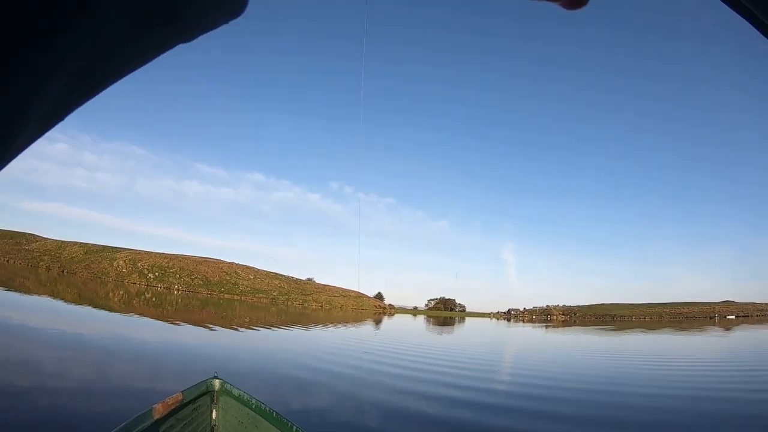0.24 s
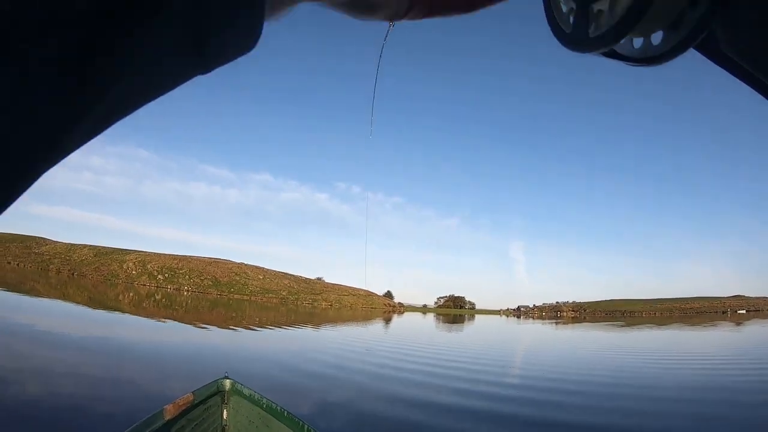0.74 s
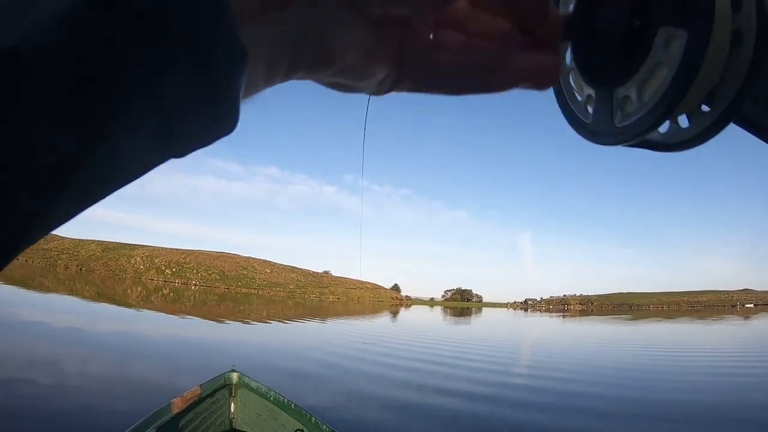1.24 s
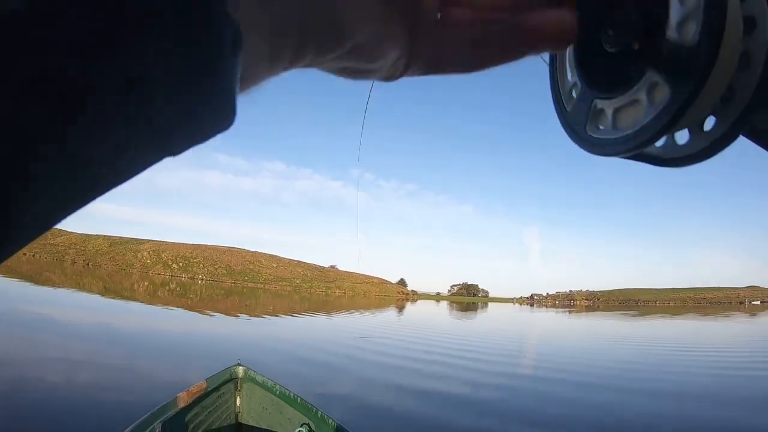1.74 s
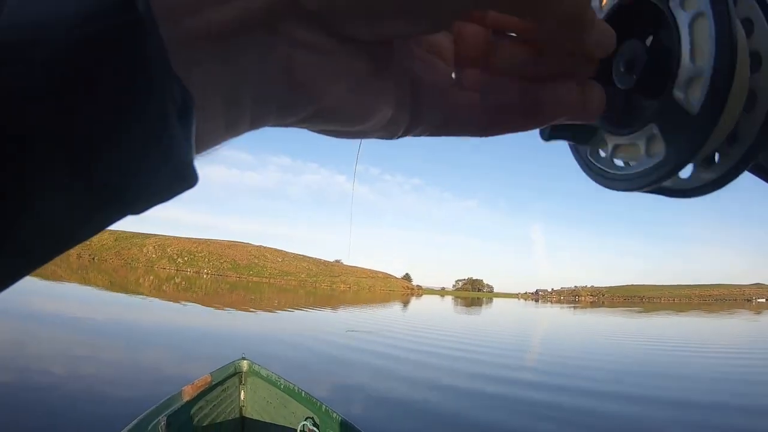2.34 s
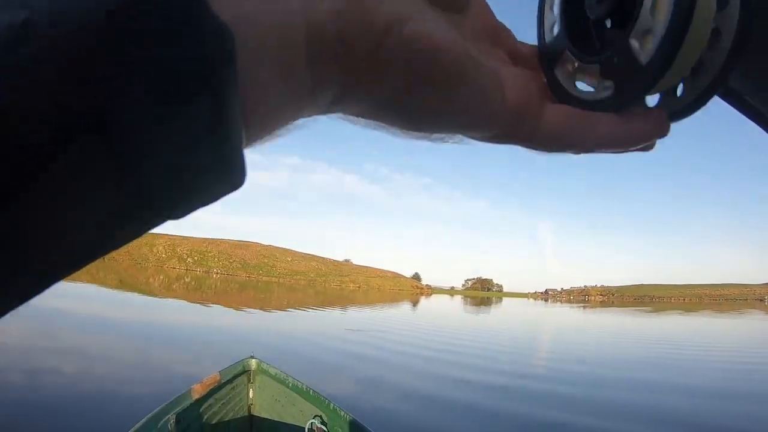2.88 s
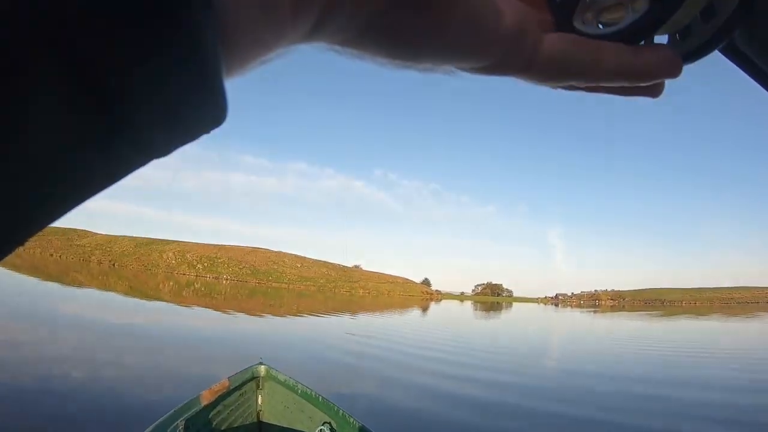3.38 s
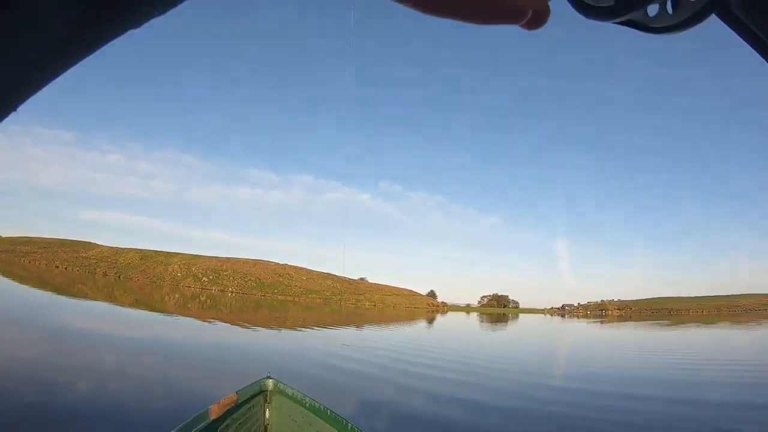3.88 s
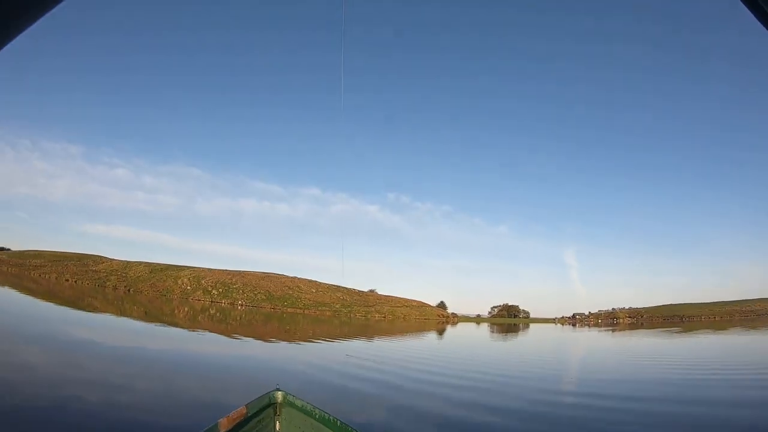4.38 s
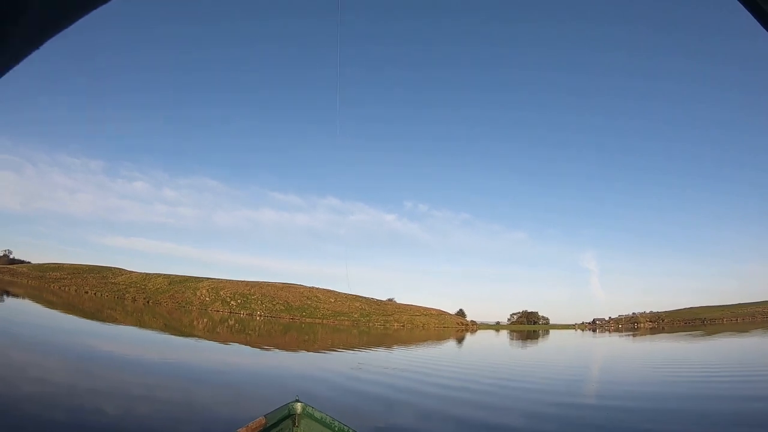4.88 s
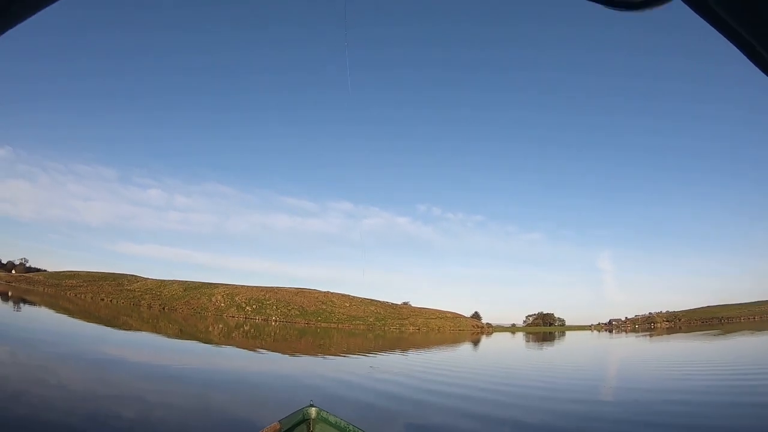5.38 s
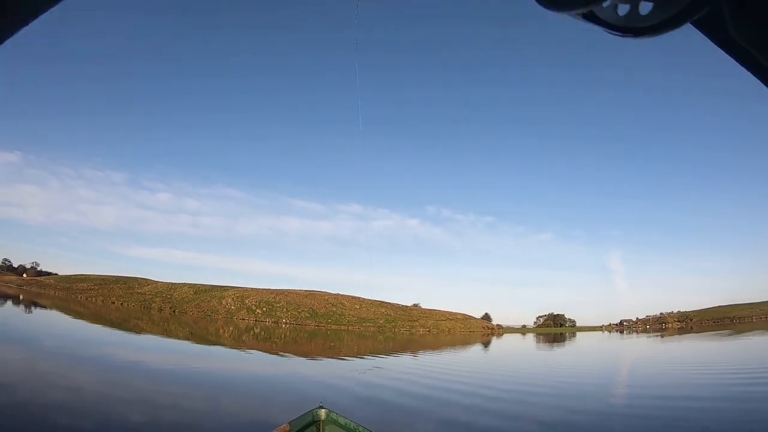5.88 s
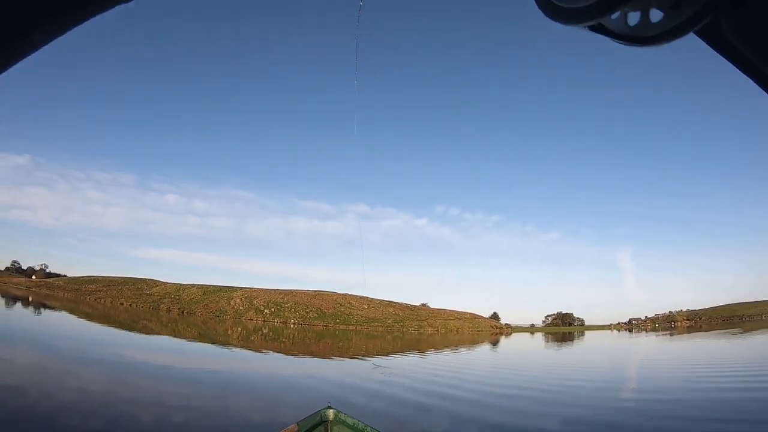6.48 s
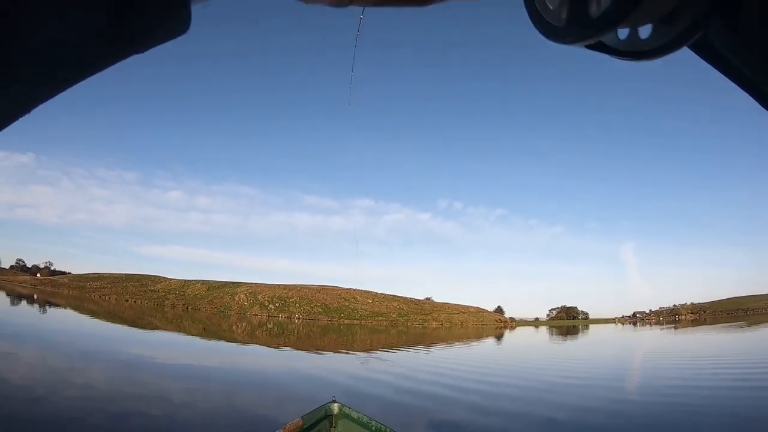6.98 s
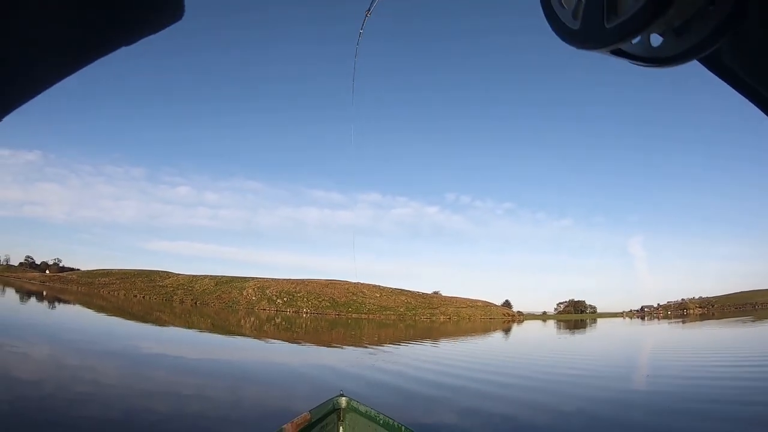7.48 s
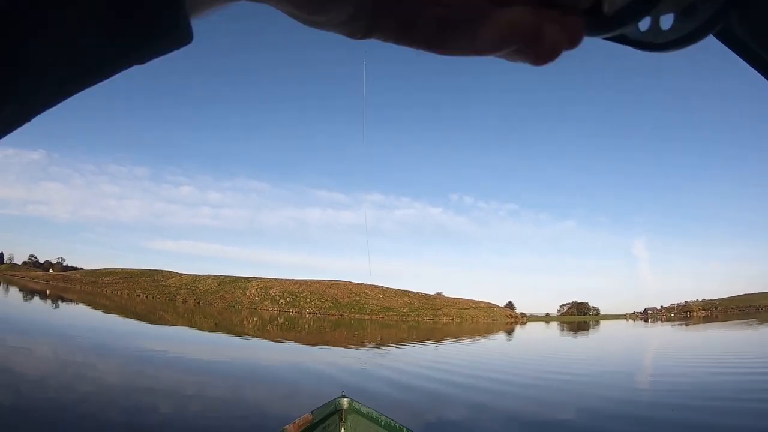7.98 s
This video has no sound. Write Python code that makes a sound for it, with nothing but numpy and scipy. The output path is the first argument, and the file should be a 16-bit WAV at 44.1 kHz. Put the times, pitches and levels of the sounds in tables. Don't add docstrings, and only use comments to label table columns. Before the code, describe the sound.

Close metallic ratchet clicking from a hand-cranked fishing reel, a short raspy zip of line, a quiet gap, then a longer steady winding and halting clicks.

```python
import sys
import numpy as np
from scipy import signal
from scipy.io import wavfile

SR = 44100
rng = np.random.default_rng(int(sys.argv[2]) if len(sys.argv) > 2 else 0)


def convert_level_to_amplitude(level_db):
    exponent = np.asarray(level_db, float) / 20
    return 10 ** exponent


def inscribe(sig):
    pcm = np.round(np.clip(np.atleast_2d(sig).T, -1, 1) * 32767)
    wavfile.write(sys.argv[1], SR, pcm.astype(np.int16))


N = 362943

# frequency in Hz, t60 in s, level winding in dB, level stripping in dB.
PAWL_MODES = [(2070, 0.006, -8, -14), (3095, 0.0048, -10, -10), (4257, 0.0042, 0, -11.5),
              (5510, 0.004, -5, 0.5), (6440, 0.0032, -3, 5.5), (7230, 0.086, -30.5, -31.5),
              (7730, 0.0035, -8.5, -10.5), (8660, 0.016, -13.5, -7), (9648, 0.0071, -1.5, -2),
              (10250, 0.0053, -11.5, -12), (12400, 0.0035, -17, -24.5), (13900, .004, -17.5, -19.5)]


def at_hz(points, hz):
    point_hz, value = np.transpose(points)
    return np.interp(np.log(hz), np.log(point_hz), value)


def drift(rate):
    knots = rng.standard_normal(int(N / SR * rate) + 2)
    return np.interp(np.arange(N) / SR * rate, np.arange(len(knots)), knots)


def filtered(x, order, hz, kind="low"):
    return signal.sosfilt(signal.butter(order, hz, kind, fs=SR, output="sos"), x)


def banded_noise(spectrum, patchy_db, alike_hz):
    out = 0
    edges = 30 * 2 ** np.arange(0, 9.6, 0.5)
    white = rng.standard_normal((2, 2, N))
    for k, (low, high) in enumerate(zip(edges, edges[1:])):
        mid, side = filtered(white[k % 2], 2, [low, high], "band")
        alike = 0.73 / (1 + (low / alike_hz) ** 2)
        gain = convert_level_to_amplitude(at_hz(spectrum, np.sqrt(low * high)) + patchy_db * drift(14))
        out = out + gain * (np.sqrt(1 + alike) * mid + np.sqrt(1 - alike) * side * [[1], [-1]])
    return out / np.sqrt(np.mean(out ** 2))


def open_air():
    # frequency in Hz, level in dB per Hz.
    air_spectrum = [(30, -28), (105, -33.5), (150, 5.5), (280, 2.5), (600, -3), (2400, -17.5), (9500, -42),
                    (15000, -51)]
    air = convert_level_to_amplitude(-60.5) * banded_noise(air_spectrum, patchy_db=6.0, alike_hz=503)
    return air - 0.55 * filtered(air, 1, [55, 115], "band")


def sleeve_rustle():
    # time in seconds, level in dB.
    rub_levels = [(0, -53.5), (0.601, -46), (2.45, -49), (2.65, -49.5), (3.1, -52.5), (3.249, -67.5),
                  (3.7, -66), (3.9, -53.5), (4.12, -55), (4.19, -66), (4.3, -53), (4.6, -59), (4.9, -46),
                  (7.41, -48.5), (7.445, -62.5), (7.75, -62), (7.85, -50)]
    # frequency in Hz, level in dB per Hz.
    cloth_spectrum = [(500, -7.5), (1300, 2.5), (4000, -1), (9700, -8), (11500, -35), (15000, -27.5)]
    rub_db = np.interp(np.arange(N) / SR, *np.transpose(rub_levels))
    return convert_level_to_amplitude(rub_db) * banded_noise(cloth_spectrum, patchy_db=4.0, alike_hz=626)


def ring(clicks, hz, t60):
    r = convert_level_to_amplitude(-60 / (t60 * SR))
    w = 2 * np.pi * hz / SR
    return signal.lfilter([0, np.sin(w)], [1, -2 * r * np.cos(w), r * r], clicks + 1e-18)


def struck(modes, s, level_db, bounce_db, fade_db, spread_db, soft_hz, count):
    # frequency in Hz, likeness of a snap at the left and right ports (1 same, -1 opposite).
    port_likeness = [(3600, 0.79), (5500, 0.5), (7500, 0.12), (13000, -0.53)]
    late_ms = np.c_[0 * s, rng.uniform(-4, 11, (len(s), count))]
    fall_db = np.where(late_ms < 0, 4.5 - 3.25 * late_ms, fade_db * late_ms)
    size = convert_level_to_amplitude(level_db[:, None] + np.where(late_ms != 0, bounce_db - fall_db, 0))
    at = np.clip((s[:, None] + late_ms / 1000) * SR, 0, N - 1).astype(int)
    out = np.zeros((2, N))
    for k, (hz, t60, mode_db) in enumerate(modes):
        brightness = min(hz / 6000, 1)
        shared, own = rng.standard_normal((2, len(s), count + 1)) * brightness
        own[:, 0] *= brightness
        shared[:, 0] = (-1) ** k * min(soft_hz / hz, 1) ** 2
        snap_db = spread_db * np.clip(rng.standard_normal((len(s), 1)), -2, 1.3)
        wander_db = 2.65 * drift(18)[at[:, :1]]
        share = size * convert_level_to_amplitude(mode_db + snap_db + wander_db)
        like = np.clip(at_hz(port_likeness, hz), -1, 1)
        left, right = shared, like * shared + np.sqrt(1 - like ** 2) * own
        for port, hit in enumerate([left, right]):
            clicks = np.bincount(at.ravel(), (share * hit).ravel(), N)
            out[port] += ring(clicks, hz, t60)
    return out


def wound_teeth(turns, teeth, slack, ring_db, effort, first):
    turn = np.repeat(np.arange(len(teeth)), teeth)
    place = np.concatenate([np.arange(n) for n in teeth])
    share = place / np.array(teeth)[turn]
    s, sin1, cos1, sin2, cos2 = np.array(turns)[turn].T
    w = 2 * np.pi * share
    lag_ms = sin1 * np.sin(w) + cos1 * (1 - np.cos(w))
    lag_ms = lag_ms + sin2 * np.sin(2 * w) + cos2 * (1 - np.cos(2 * w))
    turn_s = np.diff(np.array(turns)[:, 0])[turn]
    at = s + share * turn_s + lag_ms / 1000
    firm, loose = np.clip(rng.standard_normal((len(at), 2)), -2, 1.4).T
    is_slack = place < np.array(slack)[turn]
    loaded_db = np.array(ring_db)[np.minimum(place, len(ring_db) - 1)]
    spool_db = np.where(is_slack, -39.5, loaded_db) + 2 * firm
    pawl_db = np.where(is_slack, -22.5 - 0.48 * place, -28) + 2 * (loose - firm / 2)
    levels_db = np.c_[spool_db, pawl_db] + np.array(effort)[turn]
    return np.c_[at, levels_db][first:]


def first_winding():
    # turn start (hand over the top) in seconds, lag once a turn as sine and cosine in ms,
    # lag twice a turn as sine and cosine in ms. The last row ends the winding.
    first_turns = [
        (0.3585, -2.5, 15, -1.5, -0.19),
        (0.693, -2.5, -0.7, 3, -2.07),
        (0.9707, 5.5, -2.5, 2.5, -2.06),
        (1.2191, 2, -0.5, 3.2, -1.6),
        (1.4594, 1, -3, 1.5, 0.87),
        (1.7295, 8.5, 2, -0.5, 0.6),
        (1.9827, 4, 0.6, 3.5, -2.1),
        (2.2157, 0, 0, 0, 0),
    ]
    first_teeth = [15, 17, 15, 14, 16, 15, 14]
    first_slack = [0, 5, 4, 4, 5, 4, 4]
    first_ring = [-23, -23, -23, -23, -24.5, -23, -25, -20.5, -30, -17, -27, -21, -20.5, -21, -20.5]
    # effort on the ring in dB, on the rattle in dB.
    first_effort = [(-1.1, -1.7), (-0.5, -0.3), (0.6, 0.6), (-1.5, 0.9), (0.7, 0.4), (.6, 1.5), (1.9, 1.3)]
    return wound_teeth(first_turns, first_teeth, first_slack, first_ring, first_effort, first=6)


def second_winding():
    # turn start (hand over the top) in seconds, lag once a turn as sine and cosine in ms,
    # lag twice a turn as sine and cosine in ms. The last row ends the winding.
    second_turns = [(4.7787, -2.5, 13.5, 0.7, 0.0), (5.0531, 5, 6.5, 1.5, 1.9), (5.2738, 4, 1.5, 2.5, 0.1),
                    (5.4947, 0.6, 0.7, 2.5, 1.1), (5.711, 0.7, 2.5, 2.5, -0.7), (5.931, 2.5, 2.1, 3, -1.0),
                    (6.1394, 3.4, 4, 3, 1.5), (6.3486, 3, 6, 1, 2.0), (6.5609, 3, 2.5, 0.1, 0.44),
                    (6.7679, 4.5, 7.5, -0.5, 1.5), (6.9849, 5, 3, 0.2, -0.63), (7.1997, 3.0, 5.5, 0, 0.2),
                    (7.4079, 0, 0, 0, 0)]
    second_teeth = [15] * 9 + [16, 14, 15]
    second_slack = [0] + [3] * 5 + [2] * 6
    second_ring = [-22, -22, -22, -20, -21.5, -22.5, -23.5, -24, -25, -20.5, -22, -26, -20, -21, -20.5]
    # effort on the ring in dB, on the rattle in dB.
    second_effort = [(-1.4, -.3), (-1.1, .3), (-1.3, .3), (0.18, 0.38), (0.37, .3), (0.56, -.3),
                     (0.37, -0.41), (-.3, -.3), (0.76, -0.29), (-0.58, -0.15), (-0.11, -0.67),
                     (0.37, -0.02)]
    return wound_teeth(second_turns, second_teeth, second_slack, second_ring, second_effort, first=4)


def frame_knocks():
    # start in seconds, level in dB.
    spool_knocks = [(0.2729, -22.5), (2.3141, -23), (4.5322, -32), (4.5365, -35), (4.6864, -21),
                    (4.8645, -27.5), (4.8878, -23), (4.9118, -37), (7.8273, -32)]
    # frequency in Hz, t60 in s, level in dB.
    frame_modes = [(2130, 0.0068, -0.5), (2430, 0.022, -3)]
    return struck(frame_modes, *np.transpose(spool_knocks), bounce_db=-15, fade_db=1, spread_db=1,
                  soft_hz=20000, count=4)


def winding_reel():
    # start in seconds, spool ring in dB, pawl rattle in dB.
    loose_ticks = [(0.1725, -42, -43), (2.3141, -35, -34), (2.3224, -45, -27.5), (2.3318, -48, -25),
                   (2.3404, -40, -38), (2.35, -40.5, -32), (2.3604, -40, -32), (2.375, -45, -38),
                   (2.395, -26.5, -36), (3.5343, -47, -36.5), (3.8169, -48, -35), (3.8746, -56, -33.5),
                   (4.082, -60, -37), (4.2207, -34, -52), (4.2359, -40, -46), (4.2697, -44, -41),
                   (4.2875, -35, -38), (4.3237, -35.5, -63), (4.3306, -38, -45), (4.4189, -58, -37),
                   (4.5322, -30, -45), (4.5365, -53, -31.5), (7.7334, -36, -54)]
    # start in seconds, spool
    # ring in dB, pawl rattle in dB.
    slow_teeth = [(0.264, -51, -39.5), (0.2729, -28.5, -31), (0.33, -58, -20.5), (0.3619, -47.5, -22.5),
                  (0.3874, -35, -21), (0.4104, -28.5, -24.5), (0.4345, -33, -25.5), (0.4674, -42, -24.5),
                  (0.4998, -37.5, -27), (2.2157, -38, -17.5), (4.6864, -23, -33), (4.7207, -31, -23.5),
                  (4.7518, -32, -21), (4.7853, -37.5, -23.5), (4.8137, -29, -21), (4.8399, -35.5, -21.5),
                  (6.7977, -35, -20.5), (7.4076, -20.5, -38)]
    # start in seconds, spool ring in dB, pawl rattle in dB.
    halting_teeth = [(7.8263, -26, -32), (7.8618, -38, -25.5), (7.893, -25.5, -25.5), (7.921, -24.5, -23.5),
                     (7.9448, -18, -33), (7.9606, -39, -21.5), (7.973, -22, -35.5), (8.0131, -28, -34),
                     (8.0363, -30.5, -28), (8.056, -22.5, -28.5), (8.0735, -23.5, -29.5),
                     (8.0905, -20.5, -29.5), (8.1079, -21, -30), (8.1237, -29, -29), (8.1402, -19.5, -30.5),
                     (8.1632, -22, -36), (8.1956, -20, -30), (8.218, -30.5, -22)]
    # frequency in Hz, t60 in s, level in dB.
    spool_modes = [(1502, 0.032, -17.5), (2143, 0.0092, -12.5), (2940, 0.0045, -3.5), (3265, 0.0082, -1.5),
                   (3645, 0.013, -1.5)]
    # time in seconds, rattle level in dB, pan to the left in dB.
    reel_places = [
        (3.2, 1.4, 2.2),
        (4.6, -1.1, 1.1),
    ]
    ticks = np.array(loose_ticks) - [0, 8.5, 0]
    snaps = np.vstack([first_winding(), second_winding(), slow_teeth, halting_teeth, ticks])
    s, spool_db, pawl_db = snaps.T
    spool = struck(spool_modes, s, spool_db + 7.5, bounce_db=-12, fade_db=1.2, spread_db=1.6,
                   soft_hz=20000, count=8)
    spool = filtered(spool, 2, 5600)
    pawl = struck(np.array(PAWL_MODES)[:, :3], s, pawl_db + 1.0, bounce_db=-1.0, fade_db=1.96,
                  spread_db=2.0, soft_hz=7050, count=32)
    moved_s, *place = np.transpose(reel_places)
    near_db, pan_db = [np.interp(np.arange(N) / SR, moved_s, column) for column in place]
    pawl = pawl * convert_level_to_amplitude(near_db + pan_db * [[1], [-1]])
    body = (spool + frame_knocks()) * convert_level_to_amplitude([[-0.9], [0.9]])
    return filtered(body + pawl, 6, 1850, "high")


def knocks():
    # start in seconds, level in dB, frequency in Hz, length in s.
    housing_bumps = [(0.306, -49, 190, 0.029), (1.268, -47, 294, 0.03), (2.302, -47, 214, 0.038),
                     (2.509, -47.5, 213, 0.032), (2.933, -54, 367, 0.028), (4.059, -37, 810, 0.0022),
                     (4.102, -53, 338, 0.019), (4.489, -44.5, 139, 0.069), (5.48, -52.5, 218, 0.099),
                     (6.46, -47, 216, 0.15), (7.001, -55, 250, .035)]
    out = np.zeros(N)
    for s, level_db, hz, length in housing_bumps:
        swell = np.exp(-((np.arange(N) / SR - s) / length * 2 - 1) ** 2 * 2)
        push = np.gradient(rng.standard_normal(N)) * swell
        dull = ring(ring(push, hz, 2.0 / hz), hz, 2.0 / hz)
        out += convert_level_to_amplitude(level_db) * dull / np.abs(dull).max() * 2
    return out


def stripped_teeth():
    # time in seconds, teeth per second, rattle in dB.
    line_pull = [
        (2.427, 74, -36.5),
        (2.508, 170, -20.5),
        (2.562, 145, -29),
        (2.716, 281, -26.5),
        (2.772, 287, -27.5),
        (2.84, 272, -24.5),
        (2.95, 130, -28.5),
        (3.098, 88, -29.5),
        (3.164, 40, -35),
    ]
    s, per_s, rattle_db = np.transpose(line_pull)
    t = np.arange(s[-1], s[0], -1 / SR)
    tooth = np.arange(150)
    teeth_passed = np.cumsum(np.interp(t, s, per_s)) / SR
    at = np.interp(tooth, teeth_passed, t, right=0)
    swell_db = 1 * np.cos(2 * np.pi * (tooth / 15 - 0.2))
    slowness = max(per_s) / np.interp(at, s, per_s)
    jitter_ms = 0.045 * np.minimum(slowness, 2) ** 3
    at = at + jitter_ms / 1000 * rng.standard_normal(len(at))
    return at, np.interp(at, s, rattle_db, left=-200) + swell_db


def stripped_line():
    teeth = stripped_teeth()
    modes = np.array(PAWL_MODES)[:, [0, 1, 3]]
    buzz = struck(modes[:3], *teeth, bounce_db=-12, fade_db=2.5, spread_db=1.2, soft_hz=20000, count=4)
    rasp = struck(modes[3:], *teeth, bounce_db=-9, fade_db=1.4, spread_db=1, soft_hz=4000, count=40)
    rasp = filtered(rasp, 4, 4100, "high")
    stripped = (convert_level_to_amplitude(9.0) * buzz + convert_level_to_amplitude(6.5) * rasp) * convert_level_to_amplitude([[1.2], [-1.2]])
    return filtered(stripped, 2, 950, "high")


def bird():
    # start in seconds, length in s, first frequency in Hz, last frequency in Hz, level in dB.
    chirps = [
        (3.445, .03, 3700, 4400, -62),
        (3.435, .015, 6700, 5800, -71),
        (7.78, 0.045, 5200, 3500, -67),
        (7.985, .025, 5300, 4700, -50),
    ]
    out = np.zeros(N)
    for s, length, from_hz, to_hz, level_db in chirps:
        n, start = int(length * SR), int(s * SR)
        phase = 2 * np.pi * np.cumsum(np.linspace(from_hz, to_hz, n)) / SR
        out[start:start + n] += convert_level_to_amplitude(level_db) * np.hanning(n) * np.sin(phase)
    return out


def scene():
    return open_air() + sleeve_rustle() + winding_reel() + knocks() + stripped_line() + bird()


def roll_off(x):
    return signal.sosfilt(signal.butter(12, 16800, fs=SR, output="sos"), x)


def record(dry):
    mix = 0.63 * np.tanh(dry / 0.61)
    return roll_off(mix)


dry = scene()
out = record(dry)
inscribe(out)
```